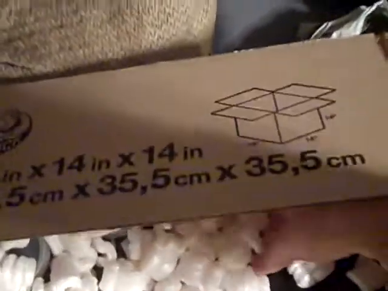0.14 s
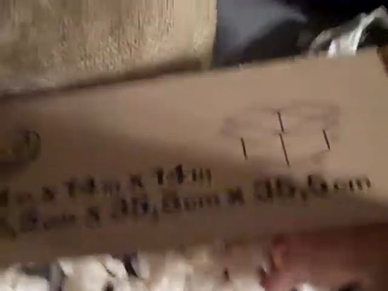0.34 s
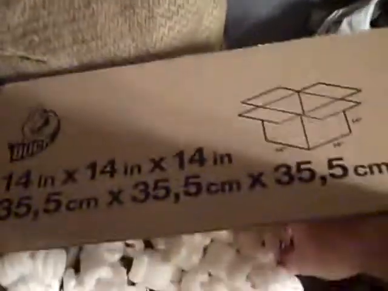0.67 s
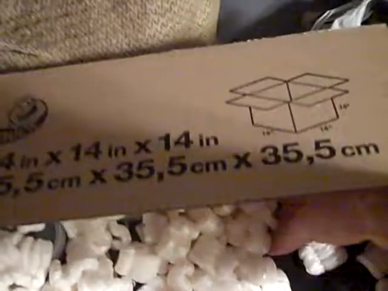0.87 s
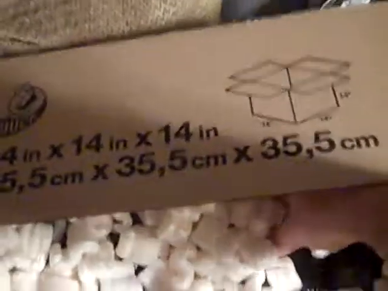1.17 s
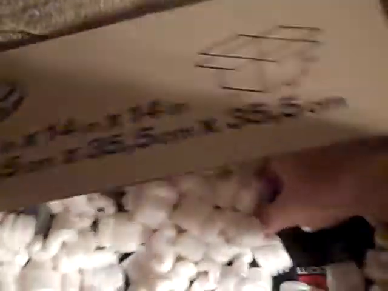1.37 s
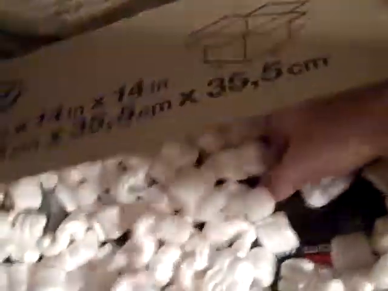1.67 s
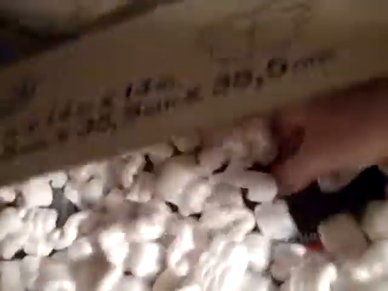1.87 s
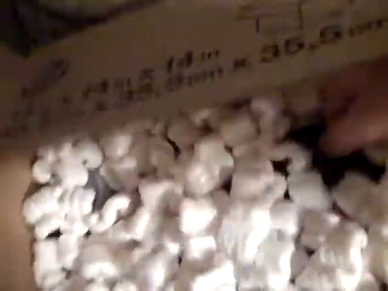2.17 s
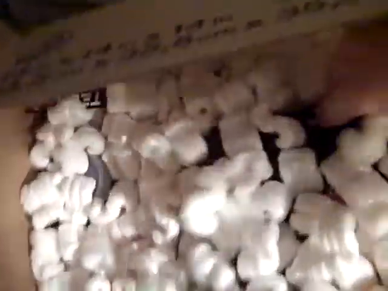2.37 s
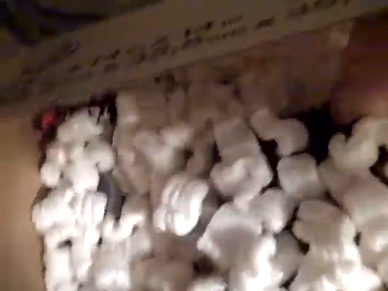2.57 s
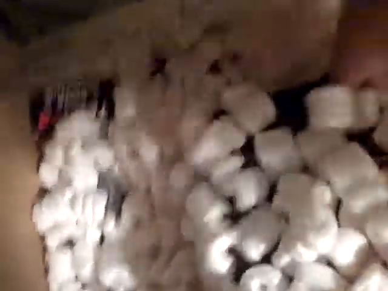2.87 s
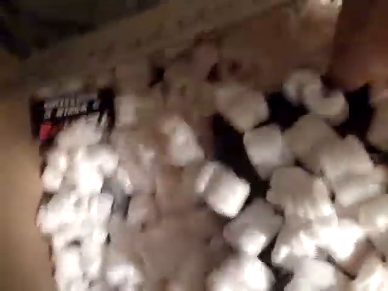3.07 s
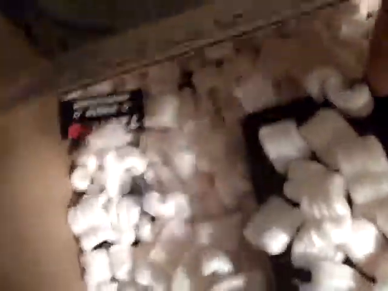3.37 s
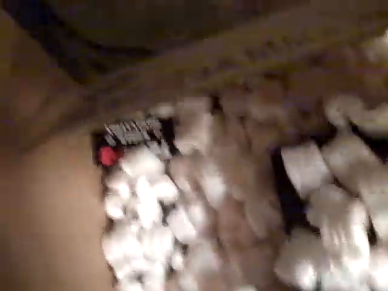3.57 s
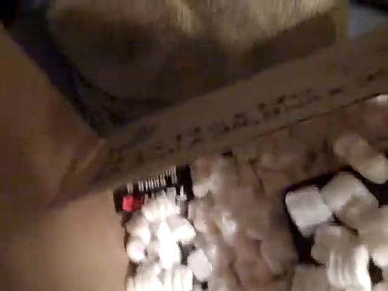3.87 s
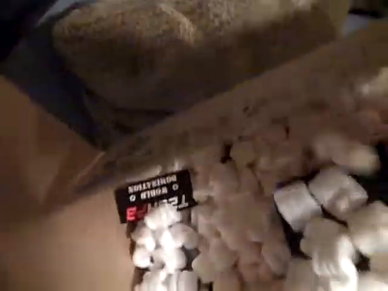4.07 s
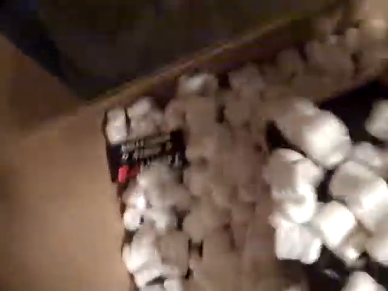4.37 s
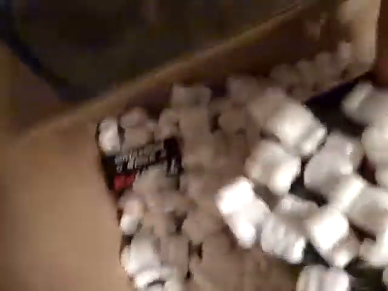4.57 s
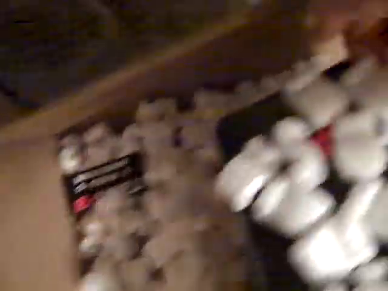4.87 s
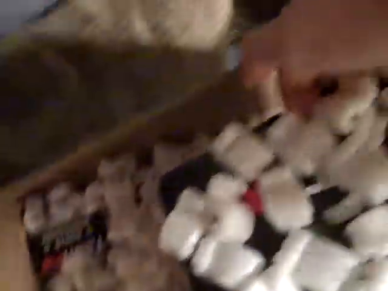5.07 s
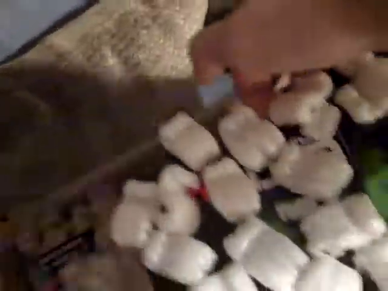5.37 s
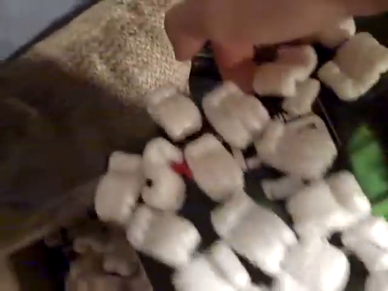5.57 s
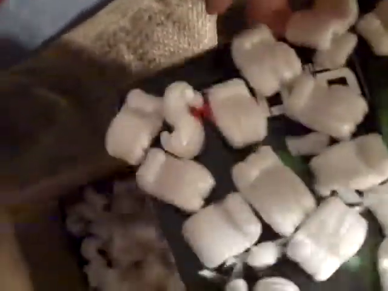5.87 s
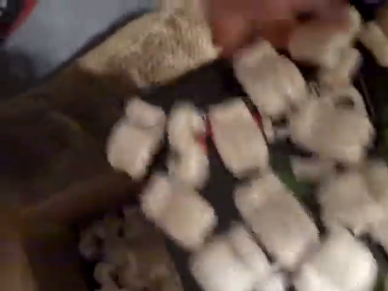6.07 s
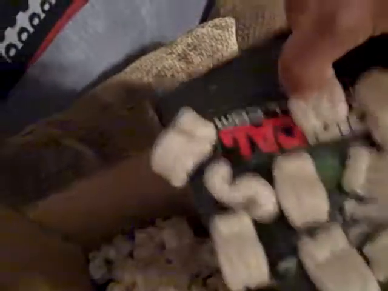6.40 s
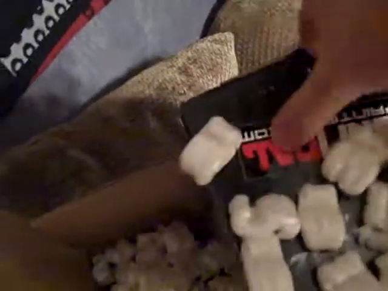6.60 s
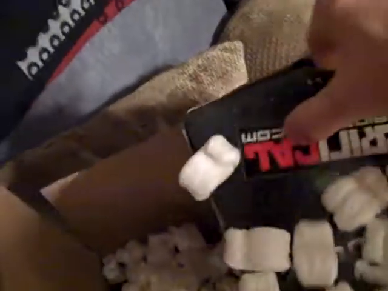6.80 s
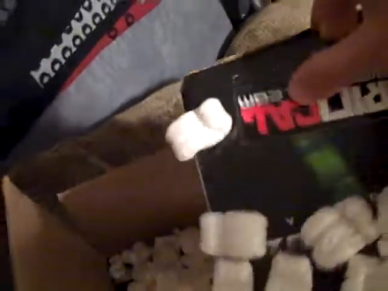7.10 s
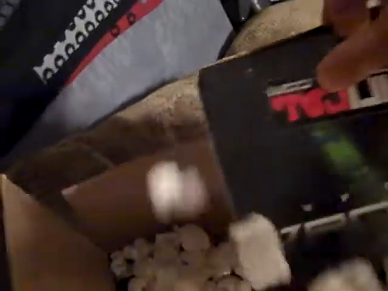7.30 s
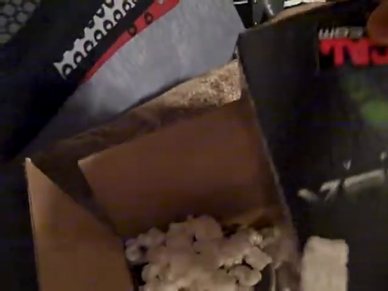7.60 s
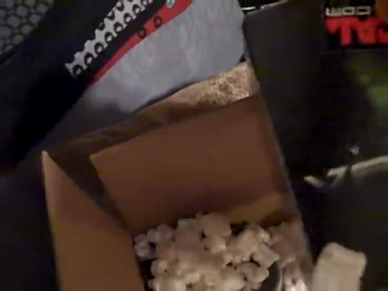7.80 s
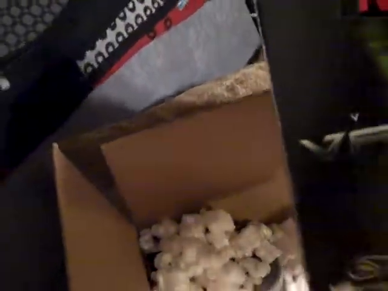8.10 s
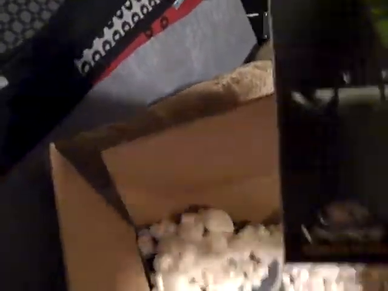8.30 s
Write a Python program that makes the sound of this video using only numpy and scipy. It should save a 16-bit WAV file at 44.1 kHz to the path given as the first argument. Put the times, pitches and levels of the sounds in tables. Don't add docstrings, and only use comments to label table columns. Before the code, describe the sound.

Heard very close on a phone, a hand works through foam packing peanuts in a cardboard box. For the first 1.5 seconds the rubbing is light and crackly, with small clicks, a knock and two tiny board creaks near 1.1 and 1.4. A very sharp snap at 1.6 opens the strongest digging: dense, bright crunching surges until about 3, with ringing wall panels, knuckle knocks, and another crisp burst near 2.9. From 3 to 4.5 it eases into softer rustles, taps and low rumbles as the box shifts. A flat carton bumps the walls, with a loud burst and hollow thumps around 5.5. Near 6.2 to 6.4 foam catches on its glossy surface in rapid dry snaps. Peanuts then slide and tick off singly over thinning rustle, ending in a few small snaps and a faint panel ring around 8.3.

```python
import sys
import numpy as np
from scipy import signal
from scipy.fft import rfft, irfft, next_fast_len
from scipy.io import wavfile
from scipy.ndimage import uniform_filter1d, map_coordinates

SR = 44100
rng = np.random.default_rng(int(sys.argv[2]) if len(sys.argv) > 2 else 0)


def file_out(sig):
    cols = np.atleast_2d(sig).T
    lim = np.clip(cols, -1, 1)
    pcm = np.round(lim * 32767).astype(np.int16)
    wavfile.write(sys.argv[1], SR, pcm)


def amplitude_ratio(level_db):
    exponent = np.asarray(level_db, float) / 20
    return 10 ** exponent


N = 372644

EDGE_DB, ROUND = -17.5, 1.565


def unit(x):
    return x / np.sqrt(np.mean(x ** 2) + 1e-20)


def along(points, hz):
    f, v = np.transpose(points)
    return np.interp(np.log(hz + 1), np.log(f + 1), v)


def wobble(rate):
    knots = rng.standard_normal(int(N * rate / SR) + 4)
    return map_coordinates(knots, [np.arange(N) * rate / SR])


def filtered(x, response):
    m = next_fast_len(x.shape[-1] + 8192)
    spectrum = rfft(x, m) * response(np.fft.rfftfreq(m, 1 / SR))
    return irfft(spectrum, m)[..., :x.shape[-1]]


def add(out, start_s, sound):
    at = round(start_s * SR)
    out[..., at:at + sound.shape[-1]] += sound


# [pitch_hz, likeness 0-1]
PORT_LIKENESS = [(60, 0.5), (250, 0.88), (800, 0.77), (1500, 0.68), (3500, 0.55), (5000, 0.24),
                 (9000, 0.11)]


def spread(pair, spectrum):
    def turn(hz):
        return np.arccos(np.clip(along(PORT_LIKENESS, hz), -1, 1)) / 2

    def colour(hz):
        return amplitude_ratio(along(spectrum, hz)) * [np.cos(turn(hz)), np.sin(turn(hz))]

    mid, side = filtered(pair, colour)
    return np.array([mid + side, mid - side])


# [start_s, rubbing_db, wall_load_db, bottom_weight_db]
STIRRING = [(0, -39.5, -10, -7), (.42, -49, -6.5, -2.5), (.7, -39.5, -8.5, -3.5), (.88, -52.5, -4.5, -5.5),
            (1.1, -40.5, 10, 0), (1.3, -49, -11, -2.5), (1.58, -42, -8, -5), (2.2, -37, -16, -2),
            (2.6, -35, -8.5, -4), (3.3, -36, -9, -4), (4.2, -46, -6, 0), (4.5, -38, -2, -3),
            (5.4, -37.5, -4.5, -0.5), (5.75, -36, -9, 1.5), (6.15, -32, -8.5, -7.5),
            (6.8, -41.5, -11.5, 1.5), (7.3, -52.5, 0.5, 3.5), (7.8, -39, -11.5, -11.5)]
# [middle_s, length_s, rubbing_db,
# wall_load_db]
RUB_SURGES = [(0.065, 0.14, -28.5, -6.5), (0.192, 0.12, -30.5, -13.5), (0.315, 0.17, -36.5, -9.5),
              (0.465, 0.051, -34, -15), (0.541, 0.091, -36.5, -17), (0.658, 0.21, -35.5, -23),
              (0.999, 0.2, -33.5, -2.5), (1.162, 0.11, -33, -6.5), (1.468, 0.24, -38.5, 9),
              (1.527, 0.14, -32, -1.5), (1.696, 0.22, -22, -3.5), (1.848, 0.13, -23.5, 3),
              (1.982, 0.13, -22.5, -3), (2.121, 0.18, -29, -1.5), (2.263, 0.14, -31, -2),
              (2.412, 0.23, -25, -1), (2.544, 0.24, -27.5, -3.5), (2.733, 0.098, -26.5, -3),
              (2.88, 0.074, -18.5, -11), (3.003, 0.16, -29, -7.5), (3.149, 0.17, -33, -3.5),
              (3.278, 0.088, -32.5, -10), (3.432, 0.15, -33, -11.5), (3.63, 0.043, -38, -4),
              (3.934, 0.31, -41, -11), (4.069, 0.18, -38.5, -7.5), (4.339, 0.34, -33, -5.5),
              (4.54, 0.13, -32.5, -11), (4.663, 0.22, -28, -22), (4.904, 0.72, -33, -8),
           (5.074, 0.058, -49, 14), (5.217, 0.04, -36, 3), (5.351, 0.06, -33, -4), (5.403, 0.042, -33, -2),
           (5.527, 0.062, -17, -16.5), (5.651, 0.49, -23, -10.5), (5.984, 0.38, -28, -40),
           (6.312, 0.72, -35.5, -14.5), (6.545, 0.71, -33.5, -23), (6.854, 0.038, -46, 8),
           (6.949, 0.42, -35.5, -19), (7.196, 0.39, -42, -9.5), (7.378, 0.32, -40.5, -34),
           (7.48, 0.076, -36, -14.5), (7.628, 0.81, -41.5, -34), (7.862, 0.43, -33, -11.5),
           (7.971, 0.028, -28.5, 0), (8.048, 0.017, -33, -18), (8.167, 0.078, -40, -33),
           (8.26, 0.033, -42, 0), (8.351, 0.11, -30.5, -3.5)]


def effort():
    shake_db, shake_s = -14.5, 0.34
    t = np.arange(0, N + 64, 64) / SR

    def layers(rub, load, weight):
        body = rub + 0.5 + 0.66 * load
        wall = rub - 3.5 + load
        boom = rub - 2 + 0.82 * load + weight
        return np.array([rub, body, wall, boom])

    when, *bed = np.transpose(STIRRING)
    rub, load, weight = [np.interp(t, when, curve) for curve in bed]
    power = amplitude_ratio(2 * layers(rub, load, weight))
    for middle, length, rub_db, load_db in RUB_SURGES:
        surge = rub_db + EDGE_DB * np.abs(2 * (t - middle) / length) ** ROUND
        power += amplitude_ratio(2 * layers(surge, load_db, weight))
    for start, level_db, hz, _ in [*WALL_KNOCKS, *CARTON_BUMPS]:
        deep_db = 5 * np.log2(425 / hz)
        tilt = np.array([[-.5], [1]]) * deep_db
        fade = -60 * np.abs(t - start) / shake_s
        power[2:] += (t > start) * amplitude_ratio(2 * (level_db + shake_db + tilt + fade))
    power = np.abs(uniform_filter1d(power, size=7, axis=1))
    return [np.interp(np.arange(N) / SR, t, 10 * np.log10(p)) for p in power]


def contacts(rate, scatter_db, life):
    chance, size = rng.random((2, N))
    starts = (chance < rate / SR) * amplitude_ratio(-scatter_db * np.log(size + .03))
    power = signal.lfilter([1], [1, -np.exp(-1 / (life * SR))], starts ** 2)
    return unit(np.sqrt(np.abs(power)))


def blotchy(patchy_db):
    z = signal.stft(rng.standard_normal((2, N)), nperseg=512)[2]
    field = rng.standard_normal(z.shape[1:])
    field = uniform_filter1d(uniform_filter1d(field, size=5, axis=0), size=5, axis=1)
    return signal.istft(z * amplitude_ratio(patchy_db * unit(field)), nperseg=512)[1][:, :N]


# [pitch_hz, density_db per Hz]
SKIN_FIZZ = [(300, -71), (1760, -26.5), (3000, -13), (4590, -7), (5910, -1), (6430, 0.5), (7310, -2),
             (10500, -27), (11200, -53), (11400, -120), (14900, -79), (22000, -120)]
PEANUT_BODY = [(130, -60), (530, -24), (1150, -9), (1600, -7.5), (2560, -5), (4500, -10), (5850, -13),
               (9900, -120)]
BOX_WALL = [(240, -40), (420, -15), (605, -6), (730, -1), (1000, -13), (1200, -20), (1560, -45),
            (2640, -120)]
BOX_BOOM = [(15, -88), (70, -50), (110, -29), (160, -7.5), (248, -1), (299, -3.5), (365, -5.5),
            (500, -11.5), (650, -12), (1100, -120)]


def rustle():
    levels = effort()
    shove = 0.15 * wobble(25) + 0.91 * wobble(70)
    fine = 1.9 + contacts(rate=1500, scatter_db=4.5, life=0.0015)
    coarse = 1.5 + contacts(rate=110, scatter_db=2, life=0.0053)
    gates = [fine * amplitude_ratio(shove),
             fine * amplitude_ratio(.9 * shove + 1.6 * wobble(30)),
             coarse * amplitude_ratio(1.1 * shove + 2.2 * wobble(25)),
             coarse * amplitude_ratio(0.32 * shove + 1.9 * wobble(17))]
    noises = [blotchy(patchy_db) for patchy_db in (2.5, 2.5, 2.0, 1.5)]
    colours = [SKIN_FIZZ, PEANUT_BODY, BOX_WALL, BOX_BOOM]
    out = np.zeros((2, N))
    for level_db, gate, noise, colour in zip(levels, gates, noises, colours):
        out += amplitude_ratio(level_db) * unit(spread(gate * noise, colour))
    return out


def ring_board(events, cycles, attack_s):
    out, t = np.zeros(N + SR), np.arange(SR // 6) / SR

    def board(f):
        return 1j * f * 900 / (450 ** 2 - f * f + 1j * f * 900)

    for start, level_db, hz, rough_db in events:
        main = amplitude_ratio(-60 * t * hz / cycles) * np.sin(2 * np.pi * hz * t)
        rough = unit(filtered(rng.standard_normal(len(t)), board)) * amplitude_ratio(rough_db - 60 * t / 0.058)
        attack = 1 - np.exp(-t / attack_s)
        add(out, start + .002, amplitude_ratio(level_db + 2.5) * attack * (main + rough))
    return filtered(out[:N], lambda f: (1j * f / (1j * f + 90)) ** 2)


# [start_s, peak_db, pitch_hz, rough_db]
PANEL_HUMS = [(0.05, -36, 746, -20), (0.172, -28, 900, -24), (1.618, -17, 780, -20),
              (1.66, -17.5, 775, -20), (1.688, -13.5, 737, -24), (1.73, -19, 730, -20),
              (1.84, -19, 695, -22), (2.065, -25.5, 500, -20), (2.39, -23, 764, -23), (2.43, -21, 720, -20),
              (3.36, -26.5, 754, -20), (3.45, -24.5, 684, -7.5), (3.51, -37, 341, -20),
              (3.6, -24.5, 813, -25), (3.69, -34, 345, -22), (3.792, -25.5, 674, -12),
              (8.322, -21, 1080, -16), (8.345, -28.5, 530, -10), (8.362, -27, 1110, -15)]


def hums():
    return ring_board(PANEL_HUMS, cycles=49.6, attack_s=0.0073)


def snap(level_db, body_db, after_db, colour, lead_in_db, force):
    t = np.arange(-SR // 160, SR // 14) / SR
    late = np.maximum(t, 0)
    lead_in = amplitude_ratio(lead_in_db + 60 * t / 0.022)
    noise = rng.standard_normal((2, 2, len(t))) * np.where(t >= 0, 1, lead_in)
    noise[:, 0, SR // 160 + 2] = force
    after = amplitude_ratio(after_db - 60 * late / 0.088)
    skin = spread(noise[0] * (amplitude_ratio(-60 * late / .006) + after), colour)
    body = spread(noise[1] * (amplitude_ratio(-60 * late / 0.015) + after), PEANUT_BODY)
    skin = skin / np.abs(skin).max()
    body = body / np.abs(body).max()
    return t[0], amplitude_ratio(level_db + 0.5) * (skin + amplitude_ratio(body_db) * body)


# [start_s, peak_db, body_db, after_rustle_db]
PEANUT_SNAPS = [(0.1688, -27, 3, -1), (0.2588, -40, -18, -16), (0.278, -34, -23, -1), (0.443, -31, -9, -4),
                (0.46, -28.5, 1.5, 0), (0.5308, -20, -16, -7), (0.77, -24, -2.5, -6), (0.9253, -28, -8, 3),
                (1.138, -19.5, 9.5, -16), (1.287, -41, 9, 5.5), (1.4395, -21, 13.5, -32),
                (1.4618, -15, -3, -8), (1.6056, 0, -8, -22), (1.7345, -12, -8, -16), (1.959, -12, -8, -16),
                (2.434, -15, -8, -18), (2.349, -32, 14, -26), (2.407, -8, -22, -2), (3.0894, -33, -14, -14),
                (3.3822, -19.5, -23, 2), (3.8406, -25, -22, -10), (4.0583, -22, 3, -12),
                (4.629, -18.5, -0.5, -5), (5.0514, -17.5, -16, 5), (5.091, -18, -23, -3),
                (5.517, -9, -21, -8), (5.9683, -30, -21, -10), (6.2811, -18, -24, -14),
                (6.3085, -6.5, -11.5, -15), (6.527, -17, -9, 8), (6.6248, -30, 9.5, -7),
                (6.768, -22, -18, -22), (6.8402, -16.5, -4.5, -9), (6.8686, -36, -7, -16),
                (7.155, -24, -26, -10), (7.25, -35, 7, -14), (7.285, -34, 5, -11), (7.3655, -25, -4, -5),
                (7.3983, -24, -30, -20), (7.456, -18, -14, -1), (7.493, -20, -11, -16),
                (7.582, -19, -8.5, -12), (7.7243, -21, -10, -3), (7.743, -22, -2.5, -2),
                (7.8962, -13.5, -10.5, 5), (7.9615, -16.5, 1.5, 2), (8.12, -29, -4, -1),
                (8.2443, -24, -8, 9), (8.2933, -21, -16, -30), (8.3187, -17, -10, 3)]


def snaps():
    out = np.zeros((2, N + SR))
    for start, level_db, body_db, after_db in PEANUT_SNAPS:
        lead, sound = snap(level_db, body_db, after_db, SKIN_FIZZ, lead_in_db=-15.5, force=2.6)
        add(out, start + .001 + lead, sound)
    return out[:, :N]


# [start_s, length_s, level_db]
FLOOR_JOLTS = [(1.156, 0.072, -49), (1.578, 0.027, -54), (1.732, 0.08, -50), (1.876, 0.054, -53),
               (1.945, 0.052, -42), (2.004, 0.034, -57), (2.079, 0.04, -49), (2.17, 0.03, -47),
               (2.44, 0.046, -54), (2.58, 0.034, -54), (2.732, 0.055, -51), (2.892, 0.045, -52),
               (2.963, 0.044, -50), (3.013, 0.048, -52), (4.013, 0.11, -40.5), (4.293, 0.11, -43.5),
               (4.462, 0.055, -49), (4.566, 0.122, -42.5), (4.717, 0.094, -43), (4.853, 0.15, -48),
               (5.023, 0.038, -53), (5.432, 0.28, -40), (5.725, 0.09, -50.5), (6.26, 0.03, -55),
               (6.433, 0.04, -49), (6.741, 0.035, -51), (6.85, 0.11, -44), (8.39, 0.049, -52)]
# [start_s, length_s, level_db]
FLOOR_CREEPS = [
    (0.377, 0.7, -63.5),
    (1.25, 0.14, -60),
    (1.5, 2.3, -63),
    (3.197, 0.68, -62.5),
    (5.05, 0.3, -63),
    (6.103, 0.9, -66),
    (6.95, 0.2, -66),
    (7.25, .1, -62),
    (7.55, 0.11, -63),
    (8.05, .3, -64.5),
]
# [pitch_hz, density_db per Hz]
FLOOR_RUMBLE = [(15, -30), (40, -6), (75, -3), (120, 2.5), (200, -120)]


def jolts():
    t = np.arange(0, N + 64, 64) / SR
    swell = np.zeros(len(t))
    for start, length, level_db in [*FLOOR_JOLTS, *FLOOR_CREEPS]:
        swell += amplitude_ratio(level_db + 3.5 + EDGE_DB * np.abs(2 * (t - start) / length - 1) ** ROUND)
    rumble = unit(spread(rng.standard_normal((2, N)), FLOOR_RUMBLE))
    return np.interp(np.arange(N) / SR, t, swell) * rumble


# [start_s, peak_db, pitch_hz, rough_db]
WALL_KNOCKS = [(0.442, -48, 689, 7.5), (0.945, -46, 290, 5), (1.1, -22.5, 483, -14), (1.395, -47, 770, -15),
               (1.609, -16.5, 796, -8), (1.81, -15, 704, -23), (1.955, -13.5, 323, -13),
               (1.97, -19, 700, -14), (2.728, -28, 736, -16), (2.854, -25, 796, -33),
               (2.968, -20, 246, -4.5), (3.213, -31, 297, -18), (3.281, -25.5, 675, -11),]
# [start_s, peak_db, pitch_hz, rough_db]
CARTON_BUMPS = [(4.036, -22.5, 382, -12), (4.351, -25.5, 550, -16), (4.468, -23.5, 452, -23),
                (4.585, -25.5, 317, -7.5), (4.613, -24, 280, -8), (4.726, -21, 322, -31),
                (4.755, -26, 172, 1.5), (4.866, -28, 293, -14), (4.887, -22, 400, -8),
                (5.477, -25.5, 347, -1.5), (5.539, -10, 228, -28), (5.625, -13.5, 223, -9.5),
                (6.163, -21.5, 276, -14), (6.263, -27, 272, -22), (6.432, -23.5, 297, -7),
                (6.596, -40, 334, -12), (6.611, -32.5, 304, -6), (6.867, -19, 270, -18),
                (7.723, -36, 535, 2.5), (7.962, -25, 530, -12.5), (8.319, -26, 560, -7)]


def knocks():
    return ring_board([*WALL_KNOCKS, *CARTON_BUMPS], cycles=14.8, attack_s=.0012)


# [start_s, peak_db, pitch_hz, rough_db]
BOARD_TICKS = [(0.727, -32, 890, -12), (0.815, -42, 900, 0.5), (1.137, -15.5, 1280, -19),
               (2.05, -23, 700, -15), (2.093, -20, 490, -25), (2.516, -27, 740, -21),
               (2.923, -24, 860, -9.5), (3.244, -23, 921, -18), (3.864, -36, 630, -8),
               (3.8995, -26, 1140, -14), (3.9739, -19.5, 885, -9.5), (4.503, -26, 616, -6.5),
               (5.608, -13, 696, -20), (6.008, -46, 608, -14), (6.035, -50, 595, -20),
               (6.063, -35, 692, -16), (6.091, -28, 840, -15), (6.867, -15, 1400, -8),
               (7.207, -25, 790, -11.5), (7.3955, -29, 600, -9.5), (7.479, -30, 1120, -14),
               (7.86, -21.5, 840, -8), (7.8965, -21, 1180, -14.5), (7.9624, -21, 1160, -19)]


def ticks():
    return ring_board(BOARD_TICKS, cycles=9, attack_s=0.00034)


# [start_s, length_s, first_slips_per_s, last_slips_per_s, level_db, peak_place 0-1]
BOARD_CREAKS = [
    (1.0591, .043, 194, 226, -8, .44),
    (1.4217, .035, 190, 205, -10.5, .5),
]


def creaks():
    out = np.zeros(N + SR)
    for start, length, first, last, level_db, top in BOARD_CREAKS:
        u = np.arange(round(length * SR)) / (length * SR)
        cycle = (np.cumsum(first + (last - first) * u) / SR + .5) % 1 - .5
        v = cycle / (.14 - 0.12 * u)
        slip = v * np.exp(-v ** 2 / 2) * np.where(v < 0, 1.5, .7)
        grit = 0.019 * rng.standard_normal(len(u)) * np.exp(-v ** 2 / 3)
        swell = np.sin(np.pi * u ** (np.log(.5) / np.log(top))) ** 2.4
        add(out, start, amplitude_ratio(level_db + 3) * swell * (slip + grit))

    def ring(f, hz, width):
        return 1j * f * width / (hz ** 2 - f * f + 1j * f * width)

    return filtered(out[:N], lambda f: ring(f, 310, 1100) + 0.2 * ring(f, 700, 90) + 5.2 * ring(f, 1880, 230))


# [start_s, peak_db]
FOAM_SLIPS = [(6.2008, -2), (6.2098, -1), (6.2175, -7), (6.2212, -14), (6.2237, -7), (6.2281, -7),
              (6.2322, -10), (6.2359, -14), (6.2399, -9), (6.2444, -18), (6.2534, -19), (6.3788, -1),
              (6.3823, -3), (6.385, -9), (6.3868, -8), (6.3884, -7), (6.3899, -7)]
# [pitch_hz, density_db per Hz]
GLOSSY_SQUEAK = [(600, -62), (2500, -18.5), (4500, -8), (5800, 2), (7200, 7), (8300, -9.5), (11000, -25),
                 (13000, -120)]


def stutter():
    out = np.zeros((2, N + SR))
    for start, level_db in FOAM_SLIPS:
        lead, sound = snap(level_db, -26, -22, GLOSSY_SQUEAK, lead_in_db=-40, force=5)
        add(out, start + lead, sound)
    return out[:, :N]


def scene():
    return rustle() + hums() + snaps() + jolts() + knocks() + ticks() + creaks() + stutter()


def muted(x):
    hz, _, z = signal.stft(x, SR, nperseg=1024)
    power = (np.abs(z) ** 2).sum(0)
    power = uniform_filter1d(uniform_filter1d(power, size=4, axis=0), size=2, axis=1)
    nearby = uniform_filter1d(uniform_filter1d(power, size=24, axis=0), size=9, axis=1)
    fizz = power[(hz > 5500) & (hz < 8000)].mean(0)
    in_range = (hz > 450) & (hz < 4500)
    weak = (power < amplitude_ratio(2 * -3) * nearby) & (power < amplitude_ratio(2 * -11.5) * fizz) & in_range[:, None]
    return signal.istft(z * amplitude_ratio(-16 * weak), SR, nperseg=1024)[1][:, :N]


def band_limit(x):
    return signal.sosfilt(signal.butter(12, 11590, fs=SR, output="sos"), x)


# [pitch_hz, left_over_right_db]
PORT_LEAN = [(60, -4), (250, -1.5), (3500, 0), (5000, -0.5), (5900, -2.5), (6600, 0.5), (7300, 12.5),
             (11000, 20.5)]
# [pitch_hz, left_lead_radians]
PORT_LEAD = [(80, .3), (400, 0), (2000, -.3), (4000, -.75), (5300, -1.1), (6300, -.2), (7500, -1.8),
             (8400, -3.1)]


def record(dry):
    def port(hz):
        return amplitude_ratio(along(PORT_LEAN, hz) / 2) * np.exp(.5j * along(PORT_LEAD, hz))

    def bass_cut(hz):
        return (1j * hz / (1j * hz + 40)) ** 2

    x = filtered(dry, lambda hz: bass_cut(hz) * np.array([port(hz), 1 / port(hz)]))
    x = muted(x)
    x = x / (1 + np.abs(x / .99) ** 8) ** (1 / 8)
    return band_limit(x)


dry = scene()
out = record(dry)
file_out(out)
```